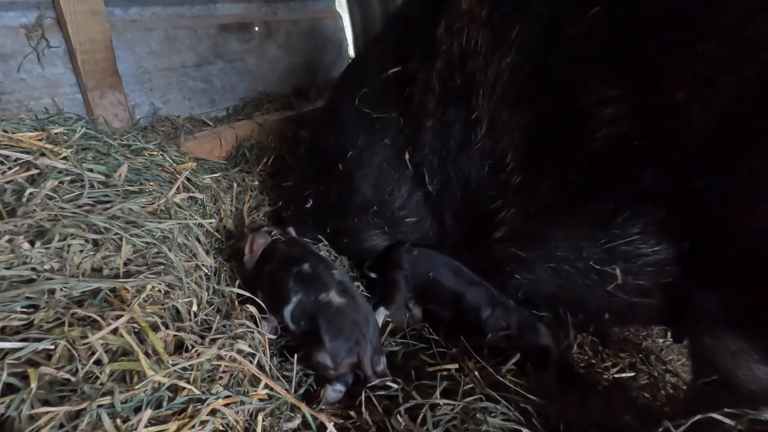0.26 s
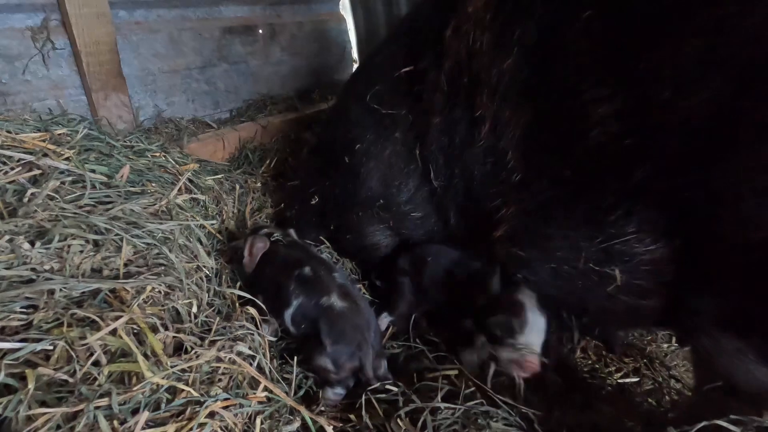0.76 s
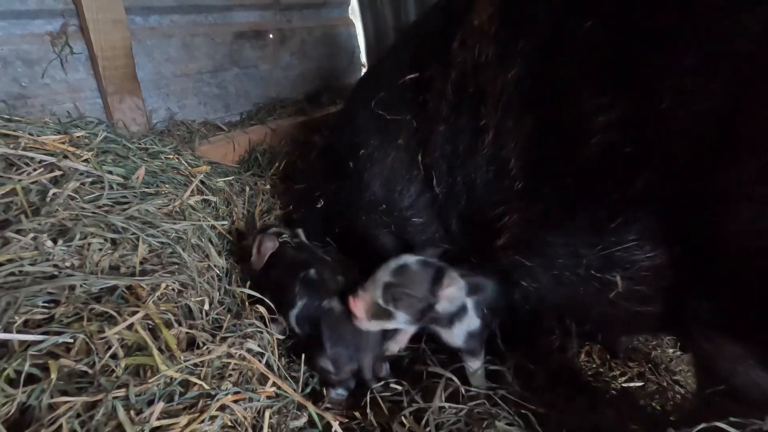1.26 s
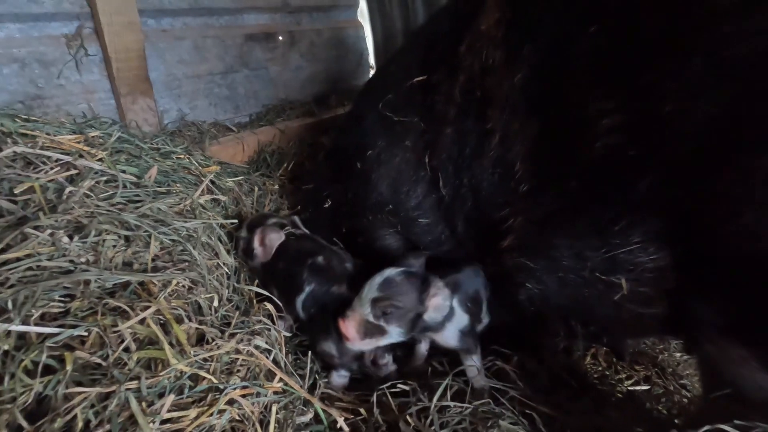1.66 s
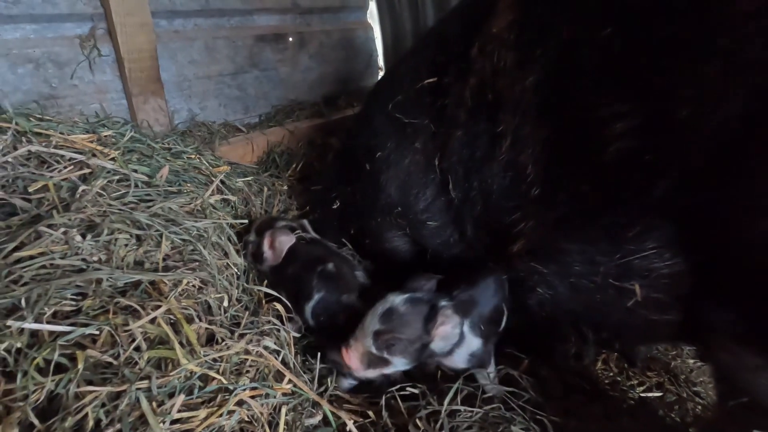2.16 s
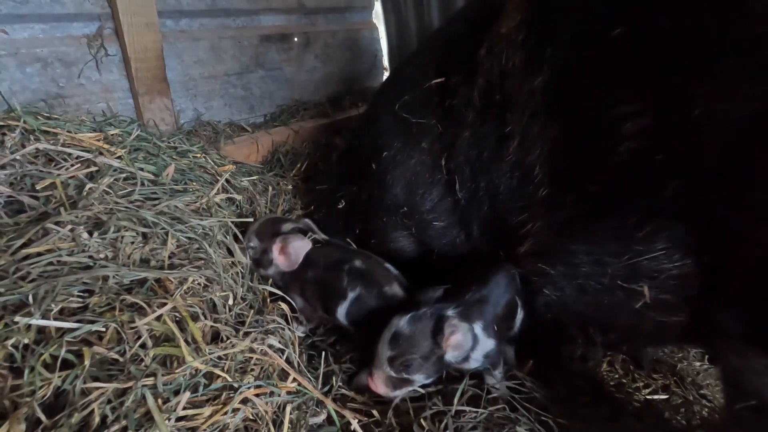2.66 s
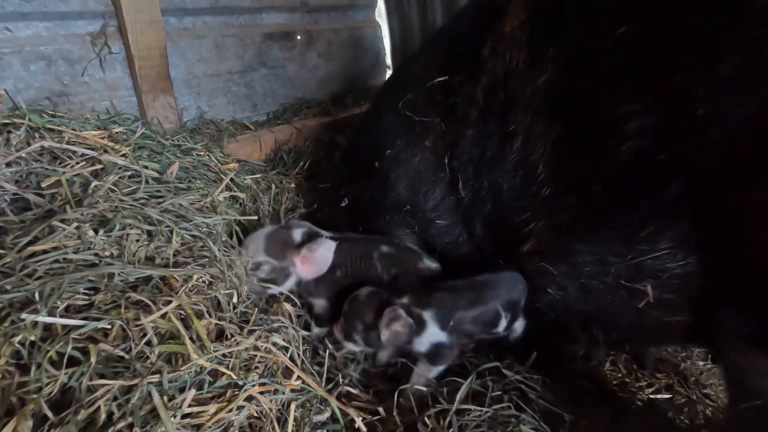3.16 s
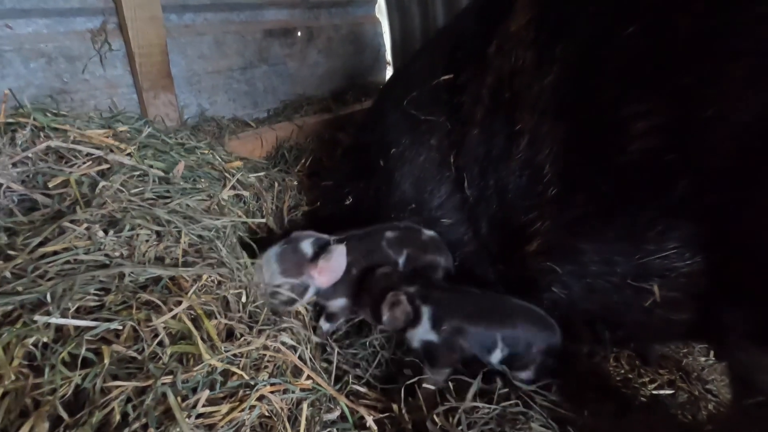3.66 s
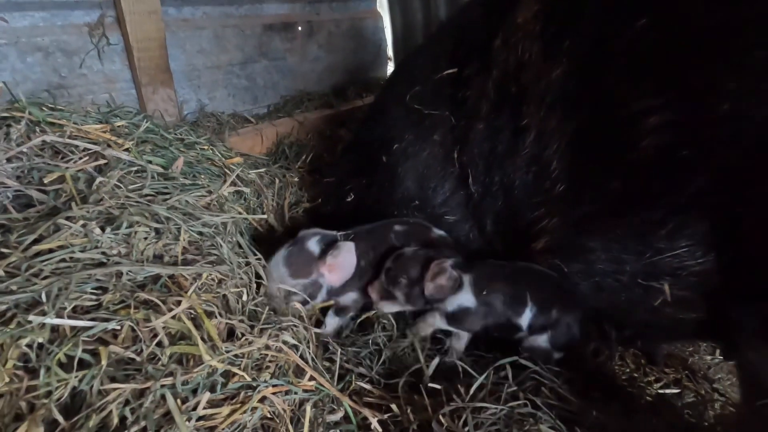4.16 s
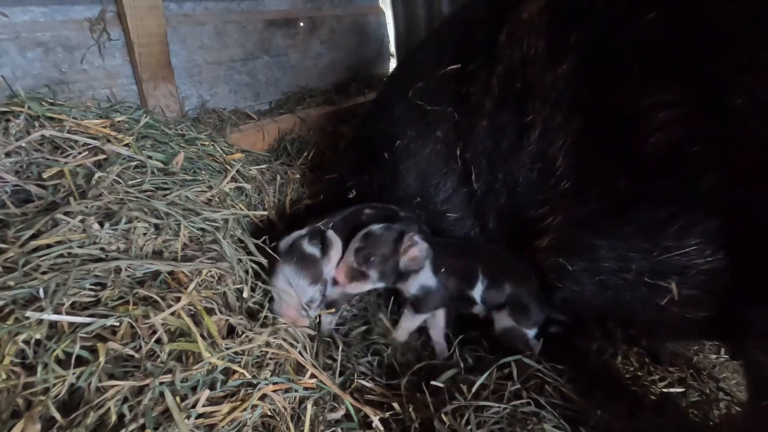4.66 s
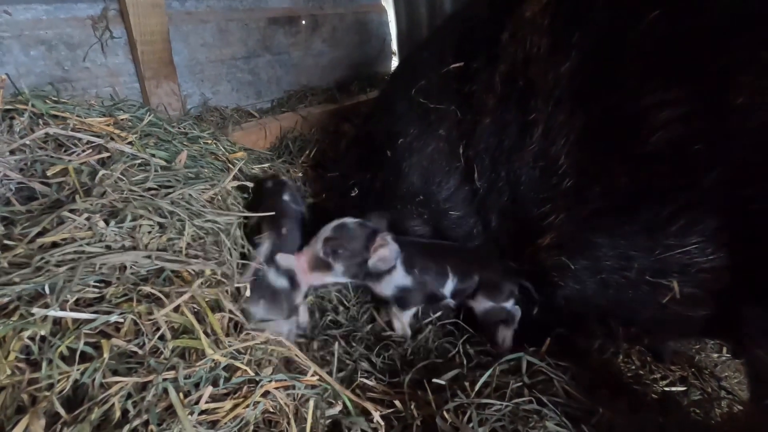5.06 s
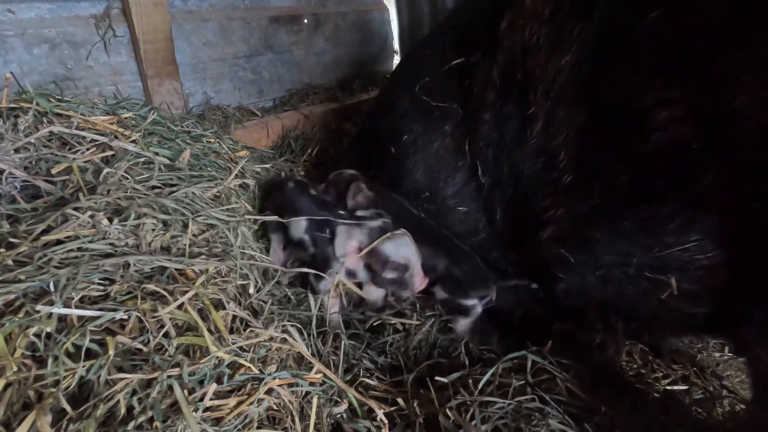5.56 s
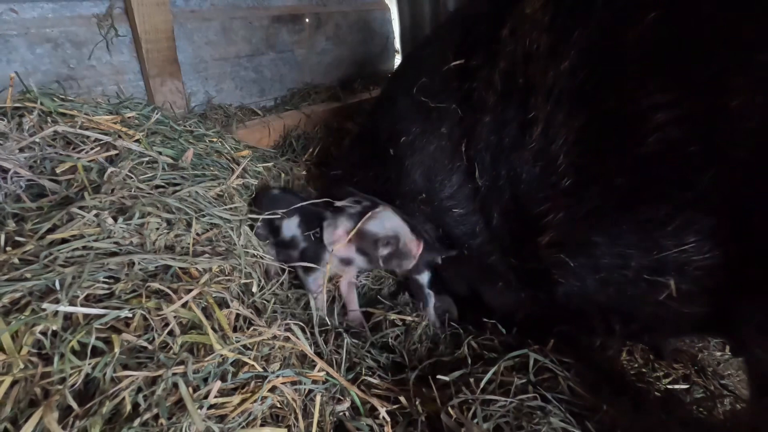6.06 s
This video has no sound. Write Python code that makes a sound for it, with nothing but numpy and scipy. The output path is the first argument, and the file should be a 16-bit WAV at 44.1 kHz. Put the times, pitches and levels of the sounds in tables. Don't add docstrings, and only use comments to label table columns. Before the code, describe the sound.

A close, dry-sounding straw pen with a short, dull echo. From 0 s a sharp grunt starts a loose run lasting the full 6.3 seconds: tiny trains of raspy pulses, bright and nasal, alternating with deeper, muffled grunts. Early grunts are spaced out, with sharp ones near 1.2 and 1.7 s; from 2.1 s a sharp grunt runs straight into a deep one. Faint thin whistles sound outside around 0.8, 1.3 and 1.7 s, a blurred trill at 2.0-2.4 s, then two clearer chirps at 2.5-2.8 s. Low rumble puffs throughout, with bumps at 1.6 s and, strongest, 3.4 s, and a long soft push at 5.6 s. Faint peeps flicker at 1.2, 4.0-4.5 and 5.4 s. Straw rustling and dry cracks thicken from 3 s, brightest around 4.7-5.6 s. Grunts continue until about 6.2 s, over soft airy hiss.

```python
import sys
import numpy as np
from scipy import signal
from scipy.fft import rfft, irfft, next_fast_len
from scipy.io import wavfile
from scipy.ndimage import uniform_filter1d, map_coordinates

SR = 44100
rng = np.random.default_rng(int(sys.argv[2]) if len(sys.argv) > 2 else 0)


def generate_wav(signal):
    frames = np.transpose(np.atleast_2d(signal))
    scaled = np.clip(frames, -1, 1) * 32767
    pcm = np.round(scaled).astype(np.int16)
    wavfile.write(sys.argv[1], SR, pcm)


def volts_from_decibels(level):
    exponent = np.asarray(level, float) / 20
    return 10 ** exponent


N = 278271


def in_time(rows):
    s, *columns = np.transpose(rows)
    return [np.interp(np.arange(N) / SR, s, column) for column in columns]


def at_hz(points, hz):
    table_hz, value = np.transpose(points)
    return np.interp(np.log(hz), np.log(table_hz), value)


def rms_one(x):
    return x / np.sqrt(np.mean(x ** 2) + 1e-20)


def add(out, s, piece):
    i = max(round(s * SR), 0)
    out[i:i + len(piece)] += piece[:N - i]


def filtered(x, order, hz, kind="low"):
    return signal.sosfilt(signal.butter(order, hz, kind, fs=SR, output="sos"), x)


def drift(rate_hz):
    knots = rng.standard_normal(400)
    place = np.arange(N) / SR * np.clip(rate_hz, .1, 60)
    return rms_one(map_coordinates(knots, [place], order=3))


def swells(rows, edge_s):
    t, power = np.arange(N) / SR, 0
    for s, length, db in rows:
        outside = np.maximum(np.abs(t - s - length / 2) - length / 4, 0)
        power = power + volts_from_decibels(2 * db) * np.exp(-(outside / edge_s) ** 2)
    return power


def effort(x):
    size = int(0.01 * SR)
    return uniform_filter1d(uniform_filter1d(x ** 2, size=size), size=size).clip(0)


def rings(modes, detune, spread_db, rise_cycles=0.23, mouth_cycles=0.17):
    t = np.arange(SR // 8) / SR
    hz, db, t60 = np.transpose(sorted(modes))[:, :, None]
    level_chance, pitch_chance = rng.standard_normal((2, len(modes), 1))
    signs = (-1) ** np.arange(len(modes))[:, None]
    rise = np.where((800 < hz) & (hz < 1900), mouth_cycles, rise_cycles)
    decay = volts_from_decibels(db + spread_db * level_chance - 60 * t / t60)
    swell = 1 - np.exp(-t * hz / rise)
    return (signs * decay * swell * np.sin(2 * np.pi * hz * (1 + detune * pitch_chance) * t)).sum(0)


# frequency_hz, likeness [0-1]
LIKENESS = [(60, .97), (130, .985), (250, 0.99), (700, 0.28), (1500, 0.5), (3000, 0.3), (5000, .9),
            (5800, .995), (7800, .995), (9000, 0.6), (14000, 0.1)]


def noise(spectrum, patchy_db, grains=1):
    low, high = spectrum[0][0], spectrum[-1][0]
    edges = low * 2 ** np.arange(0, np.log2(high / low) + .01, 1 / 3)
    out, white = 0, rng.standard_normal((2, 2, N)) * grains
    for k, (a, b) in enumerate(zip(edges, edges[1:])):
        mid, side = filtered(white[k % 2], 2, [a, b], "band")
        hz = np.sqrt(a * b)
        alike = np.clip(at_hz(LIKENESS, hz), 0, 1)
        gain = volts_from_decibels(at_hz(spectrum, hz) + patchy_db * drift(9.8))
        out = out + gain * (np.sqrt(1 + alike) * mid + np.sqrt(1 - alike) * side * [[1], [-1]])
    return rms_one(out)


def pen(x, t60, level_db, top_hz=3600):
    t = np.arange(round(t60 * SR)) / SR
    shared, *own = rng.standard_normal((3, len(t))) * volts_from_decibels(-60 * t / t60) * (t > .003)
    own = signal.lfilter(*signal.butter(1, 550, "high", fs=SR), own)
    echoes = filtered(shared + .45 * own, 2, [330, top_hz], "band")
    echoes = volts_from_decibels(level_db) * echoes / np.linalg.norm(echoes[0])
    return x + signal.fftconvolve(x[None], echoes, axes=1)[:, :N]


# time_s, level_db
STIR = [(0, 3.5), (1.1, -1), (1.5, 0), (1.8, 3.5), (2.3, 0), (2.65, -4.5), (2.92, -6.5), (3.1, -4.5),
        (3.4, -3), (4.2, 3), (5.1, 1), (6.31, 5)]


def stir():
    return in_time(STIR)[0]


# frequency_hz, level_db [dB per Hz]
AIR = [(210, -68), (350, -15.5), (547, 7), (630, -15.5), (725, 8), (813, -14), (866, -6), (1050, -0.5),
       (1350, 5), (1700, -1), (2770, -11.5), (3310, -6.5), (3570, -10.5), (7400, -28.5), (9620, -35),
       (16300, -120)]
# time_s, share [0-1]
GAP_FILL = [(0, 1), (1.1, 0.9), (1.2, .1), (3.5, 0.2), (3.7, 0.4), (3.95, 0), (4.5, 0.9), (5.2, 0),
            (6.1, 0.3), (6.31, 1)]


def air(sharp):
    full = noise(AIR, 2.2)
    fill = in_time(GAP_FILL)[0].clip(0, 1)
    hush = fill * full + (1 - fill) * filtered(full, 1, (656, 975), "bandstop")
    air_db, breath_db = -54, -12.5
    return np.sqrt(volts_from_decibels(2 * (air_db + stir())) + volts_from_decibels(2 * breath_db) * effort(sharp)) * hush


# start_s, length_s, level_db
GUSTS = [(0.13, .21, -30.5), (0.55, 0.15, -36), (0.841, 0.058, -32), (1.24, 0.031, -36), (1.63, 0.2, -35.5),
         (1.8, 0.15, -35), (2.07, 0.27, -31), (2.47, 0.24, -38.5), (3.0, 0.075, -37), (3.13, 0.083, -31.5),
         (3.32, 0.081, -37), (3.77, 0.11, -32.5), (4.0, 0.48, -34), (4.43, 0.1, -30), (4.7, 0.11, -41),
         (4.88, 0.14, -30), (5.08, 0.15, -34), (5.55, 0.14, -31), (5.78, 0.058, -32.5), (5.93, 0.091, -36),
         (6.05, 0.088, -38), (3.62, 0.069, -32), (5.5, 0.25, -32)]


def gusts():
    return swells(GUSTS, 0.035)


# frequency_hz, level_db [dB per Hz]
RUMBLE = [(11, -42), (20, -14.5), (34, -2), (48, 2), (55, -19), (60, -10.5), (70, -19), (90, -7),
          (120, -50), (200, -120)]


def wind(puffs):
    low = noise(RUMBLE, 1.0)
    height = np.abs(signal.hilbert(low[0], next_fast_len(N))[:N])
    height = uniform_filter1d(height, size=1500)
    rumble = rms_one(low / (height + 0.19) ** 0.45)
    calm_db = -40
    return np.sqrt(volts_from_decibels(2 * calm_db) + puffs) * rumble


# frequency_hz, level_db [dB per Hz]
CHEST = [(41, -54), (70, -4.5), (107, -13.5), (146, -6), (179, -7), (214, -8.5), (500, -30.5), (650, -50),
         (1100, -120)]


def chests(sharp, deep, puffs):
    driven = volts_from_decibels(2 * -12) * effort(sharp) + volts_from_decibels(2 * -15) * effort(deep) + volts_from_decibels(2 * -7.5) * puffs
    flank_db = -49 + stir()
    return np.sqrt(volts_from_decibels(2 * flank_db) + driven) * noise(CHEST, 2.65)


# frequency_hz, level_db [dB per Hz]
STRAW = [(2500, 5), (3200, -4.5), (4500, -0.5), (6000, -2.5), (8000, -1.5), (10000, -5), (12000, -3),
         (14000, -8.5), (16000, -1)]
# start_s, length_s, level_db
RUSTLES = [(0, 0.012, -69), (.53, 0.075, -70), (1.07, 0.13, -72.5), (1.42, 0.039, -73), (1.86, 0.034, -76),
           (2.1, 0.086, -67), (2.46, 0.13, -77.5), (3.0, 0.14, -70.5), (3.15, 0.13, -67),
           (3.44, 0.088, -66.5), (3.59, 0.072, -74.5), (3.79, 0.031, -71.5), (4.28, 0.14, -68.5),
           (4.7, 0.2, -69.5), (4.93, 0.12, -63), (5.08, 0.14, -66), (5.38, 0.096, -66),
           (5.56, 0.087, -67.5)]


def straw():
    slips = rng.random(N) < 900 / SR
    grains = volts_from_decibels(5.5 * np.minimum(rng.exponential(1, N), 3) * slips)
    bedding_db = -76.5 + 0.84 * stir()
    level = np.sqrt(volts_from_decibels(2 * bedding_db) + swells(RUSTLES, 0.041))
    flutter = volts_from_decibels(13.5 + 1.8 * drift(48))
    return level * flutter * noise(STRAW, 1.0, grains)


# start_s, length_s, level_db
CHIRPS = [
    (2.548, 0.079, -51.5),
    (2.7, 0.063, -54),
]
# share of length [0-1], pitch_hz, level_db
CHIRP_SHAPE = [(0, 4320, -19), (.34, 4270, -6), (.66, 4326, 1), (.8, 4260, -0.5), (.92, 3980, -0.5),
               (1.02, 3600, -10)]
# start_s, length_s, pitch_hz, level_db
WHISTLES = [
    (0.801, 0.11, 6540, -63.5),
    (1.278, 0.12, 6550, -67),
    (1.674, 0.11, 6450, -66),
]
# time_s, pitch_hz, level_db
TRILL = [(2.02, 4770, -65), (2.066, 4670, -57.5), (2.168, 4640, -65), (2.36, 4800, -66), (2.426, 4840, -61),
         (2.44, 4960, -96)]


def birds():
    out = np.zeros(N)
    smear = rms_one(filtered(rng.standard_normal(N), 2, 170))
    chirps = [[(s + share * length, hz, db + less) for share, hz, less in CHIRP_SHAPE]
              for s, length, db in CHIRPS]
    sag, edge_db = 0.005, -8
    whistles = [[(s, hz * (1 + sag), db + edge_db),
                 (s + length / 4, hz, db),
                 (s + length / 2, hz, db),
                 (s + length, hz * (1 - sag), db + edge_db)] for s, length, hz, db in WHISTLES]
    for note in chirps + whistles + [TRILL]:
        hz, db = in_time(note)
        start, end = note[0][0], note[-1][0]
        gate, = in_time([(start - .008, 0), (start, 1), (end, 1), (end + 0.003, 0)])
        flutter = smear if note is TRILL else volts_from_decibels(1.0 * drift(46))
        out += gate * volts_from_decibels(db + 7.5) * flutter * np.sin(2 * np.pi * np.cumsum(hz) / SR)
    return out


# time_s, peak_db, pitch_hz, t60_s
BUMPS = [
    (1.64, -16, 59, 0.1),
    (3.44, -10, 56, 0.08),
    (3.477, -9.5, 12.8, 0.26),
    (5.599, -21, 37, 0.34),
    (5.338, -36, 153, 0.076),
    (5.456, -26, 146, 0.064),
]


def bumps():
    out = np.zeros(N)
    for s, db, hz, t60 in BUMPS:
        add(out, s, np.sign(20 - hz) * volts_from_decibels(db) * rings([(hz, 0, t60)], 0, 0))
    return out


# time_s, peak_db, pitch_hz
TICKS = [(1.2321, -66, 11200), (1.7445, -70, 8800), (2.0717, -69, 9100), (2.4468, -63, 9800),
         (2.4882, -61, 8500), (3.024, -70, 8550), (3.5788, -62, 10100), (3.8027, -58, 10700),
         (3.9529, -60, 9100), (4.4273, -66, 8600), (4.731, -56, 11000), (4.9187, -64, 10300),
         (5.023, -64, 9510), (5.273, -55, 10600), (5.5174, -62, 8600), (5.5614, -59, 8500)]


def ticks():
    out = np.zeros(N)
    for s, db, hz in TICKS:
        modes = [(hz * side, 0, .006) for side in (.76, .88, 1.0, 1.15)]
        add(out, s, volts_from_decibels(db + 11) * rings(modes, 0.035, 3.4))
    return out


# time_s, peak_db, pitch_hz, t60_s
SNAPS = [(1.04, -26.5, 1260, 0.0046), (1.17, -28.5, 365, 0.022), (1.327, -27.5, 1260, 0.025),
         (2.023, -29, 1760, 0.0062), (2.391, -33, 503, 0.043), (2.918, -40.5, 576, 0.071),
         (3.363, -37, 560, 0.029), (4.094, -35, 510, 0.052), (4.243, -40, 444, 0.03),
         (5.456, -34, 490, 0.052), (5.472, -38, 590, 0.044), (5.881, -32, 600, 0.05)]


def snaps():
    out = np.zeros(N)
    for s, db, hz, t60 in SNAPS:
        modes = [(hz, 0, t60), (1400, -4, .02), (2300, -8, .015), (4000, -14, .01)]
        add(out, s, volts_from_decibels(db - 6.5) * rings(modes, 0.0085, 0.88))
    return out


# time_s, peak_db,
# pitch_hz, t60_s
PEEPS = [(1.19, -41, 1400, .04), (4.043, -41, 1250, .04), (4.073, -40, 1260, .045), (4.203, -49, 3320, .03),
         (4.205, -50, 4150, .03), (4.462, -40, 3170, .03), (4.463, -43, 3400, .025),
         (4.464, -45, 3680, .07), (5.386, -48, 4500, .02)]


def peeps():
    out = np.zeros(N)
    for s, db, hz, t60 in PEEPS:
        add(out, s, volts_from_decibels(db + 6) * rings([(hz, 0, t60)], 0, 0, 6, 6))
    return out


def tract_modes(place, tract, manner, colour, arc, body, throat_s, lip_s, crack_db,
                jaw_reach, jaw_order, tightening):
    throat_hz, mouth_hz, lip_hz, snout_hz = tract
    glide, throat_db, cheek_db, snout_db = manner
    lip_db, upper_db, nose_hz, nose_db, mouth_s = colour
    _, opening_db, shutting_db, snout_s, jaw_turn = arc
    wide_db = np.interp(place, [0, .65, 1], [opening_db, 0, shutting_db])
    snout_db = snout_db + wide_db
    moved = 1 + np.clip(glide * ((place - jaw_turn) / jaw_reach) ** jaw_order, -0.31, 0.31)
    mouth_hz = mouth_hz * moved
    modes = [(throat_hz * (1 + tightening * (place - .5)), throat_db, throat_s),
             (mouth_hz, 0, mouth_s),
             (lip_hz * moved, lip_db, lip_s),
             (snout_hz, snout_db, snout_s),
             (nose_hz, nose_db, .025)]
    modes += [(snout_hz * side, snout_db - 8.0, .014) for side in (.89, 1.11)]
    modes += [(mouth_hz * 1.076, crack_db, .009), (snout_hz * .97, snout_db + crack_db - 6.5, .008)]
    for hz, db, t60 in body:
        cheek = cheek_db * (250 < hz < 700)
        upper = (upper_db + wide_db) * (hz > 2200)
        modes.append((hz, db + cheek + upper, t60))
    return modes


def voice(grunts, shapes, body, tract_settings, rasp_db, rasp_s, rise_cycles, mouth_cycles,
          shut_s, open_db, dull_hz, soft_start, slowing):
    out, t, after = np.zeros(N), np.arange(SR // 40) / SR, np.arange(SR // 8) / SR
    opened = 1 / (1 + np.exp((shut_s - after) / 0.0008))
    for (first, last, peak_db, last_db, closing_db), shape in zip(grunts, shapes):
        start_db = shape[-1][0]
        count = max(round((last - first) / .023), 1)
        gaps = 1 + slowing * np.linspace(0, 1, count) ** 3
        places = np.r_[0, np.cumsum(gaps)] / gaps.sum()
        pulse_db = np.interp(places, [0, .63, 1], [peak_db + start_db, peak_db, last_db])
        rasp = rng.standard_normal(len(t))
        for place, db in zip(np.r_[places, 1 + 1.06 / count], np.r_[pulse_db, closing_db]):
            push = rasp + 1.96 * rng.standard_normal(len(t))
            push = volts_from_decibels(rasp_db) * push * t / rasp_s * np.exp(1 - t / rasp_s)
            push[0] = 1
            if place > 1 or soft_start and place == 0:
                push = signal.lfilter(*signal.butter(1 + (place == 0), dull_hz, fs=SR), push)
            modes = tract_modes(place, *shape, body, **tract_settings)
            ring = rings(modes, .007, 2.0, rise_cycles, mouth_cycles)
            pulse = signal.fftconvolve(push, ring)[:len(after)]
            shut_db = -8.5 * (place >= 1)
            add(out, first + place * (last - first), volts_from_decibels(db + (open_db + shut_db) * opened) * pulse)
    return filtered(out, 2, 5200)


# first_pulse_s, last_pulse_s, peak_db, last_db, closing_pulse_db
DEEP = [(0.186, 0.264, -38.5, -37.5, -50), (0.432, 0.546, -27, -28.5, -32), (0.793, 0.856, -44, -43.5, -67),
        (2.140, 2.270, -25, -29.5, -47), (3.073, 3.182, -28, -30, -35), (3.692, 3.785, -27.5, -25, -25.5),
        (4.021, 4.077, -56, -46, -59), (4.378, 4.486, -31.5, -28.5, -35), (4.812, 4.941, -22.5, -26, -28),
        (5.588, 5.650, -30.5, -62, -74), (5.667, 5.800, -28, -37.5, -64), (6.085, 6.174, -33, -29.5, -48)]
# throat_hz, mouth_hz, lip_hz, snout_hz
DEEP_TRACT = [(181.4, 1500, 1680, 3550), (207.4, 1285, 1660, 2920), (162.7, 1285, 443, 3800),
              (205, 1300, 1540, 2885), (208, 1010, 860, 2730), (217, 1036, 1380, 2770),
              (210, 1680, 1200, 2400), (224, 1050, 1500, 4000), (209, 1097, 1600, 3280),
              (177, 1020, 170.5, 8500), (207, 1085, 1500, 3030), (204, 1270, 1085, 2910)]
# jaw_glide [share], throat_db, cheek_db, snout_db
DEEP_MANNER = [(-0.028, 20, 6.5, 0), (0.03, 8, -11, -1.5), (0.014, 22.5, 5.5, -3), (0.027, 5, -8, -1),
               (0.22, 8, 0.5, -9.5), (0.07, 5.5, -2.5, -5), (-0.12, 3, -14, -30), (0.022, 6, -1, -8.5),
               (0.024, 1.5, -3.5, -4.5), (0.01, 15.5, 0, -18), (0.026, 6.5, 6, 8.5), (0.021, 8.5, 4, 9.5)]
# lip_db, upper_db, nose_hz, nose_db, mouth_ring_s
DEEP_COLOUR = [(-3.5, -6, 2400, 1.5, 0.025), (-6.5, 5.5, 3900, -8.5, 0.076), (-20, 2, 3200, -12, 0.063),
               (-2, 0, 3810, -13.5, 0.04), (-13, 1.5, 2270, -10, 0.043), (-13, -2, 3746, -15.5, 0.071),
               (-18, -20, 710, -11, 0.025), (-15, -6, 2270, -16, 0.055), (-12.5, -11, 2600, -14, 0.073),
               (-19, -1, 1300, -18, 0.024), (-9.5, 0, 2620, -6.5, 0.065), (-6.5, -3, 2430, -9.5, 0.035)]
# first_pulse_db [re peak], snout_first_db, snout_last_db, snout_ring_s, jaw_turn [0-1]
DEEP_ARC = [(-5, 3, 7, 0.038, 0.59), (-7, -12, -4, 0.038, 0.626), (1, 2, 8.5, 0.039, 0.65),
            (-7, -2, -9, 0.019, 0.47), (-6.5, 4, -9, 0.02, .59), (-5.5, -1, -3.5, 0.018, 0.71),
            (-9, -4, -4, .02, 0.42), (-1.5, -2, -1, 0.012, 0.393), (-7.5, 0, -10, 0.03, 0.56),
            (-5.5, -4, -4, .02, 0.52), (-10.5, -1, -5.5, 0.011, 0.59), (-6, -7, -14, 0.014, 0.68)]
# frequency_hz, level_db, t60_s
DEEP_BODY = [(41.8, -6, 0.11), (102, -30, 0.017), (295, -3.5, 0.028), (458, 0.0, 0.039), (2157, -26, 0.051),
             (2603, -11, 0.026), (3830, -20, 0.033), (4770, -24, 0.013), (5600, -18, 0.021)]


def deep_voice():
    shapes = zip(DEEP_TRACT, DEEP_MANNER, DEEP_COLOUR, DEEP_ARC)
    tract = dict(throat_s=0.096, lip_s=0.037, crack_db=-2.5, jaw_reach=0.409, jaw_order=4, tightening=0)
    return voice(DEEP, shapes, DEEP_BODY, tract, rasp_db=-40, rasp_s=0.0078, rise_cycles=0.53,
                 mouth_cycles=0.56, shut_s=0.012, open_db=-3.0, dull_hz=470, soft_start=True,
                 slowing=0.068)


# first_pulse_s, last_pulse_s, peak_db, last_db, closing_pulse_db
SHARP = [(0.007, 0.034, -25, -30, -53), (0.605, 0.658, -34.5, -36.5, -64), (1.211, 1.254, -23, -22, -60),
         (1.701, 1.769, -23, -30.5, -66), (2.076, 2.138, -27.5, -21.5, -25.5),
         (2.446, 2.511, -21.5, -23.5, -30.5), (2.972, 3.038, -24, -21, -46), (3.579, 3.651, -27, -34, -35),
         (3.801, 3.827, -21, -29.5, -41), (4.150, 4.201, -45.5, -44, -61), (4.269, 4.336, -27, -25, -56),
         (4.671, 4.730, -23, -20, -27), (5.048, 5.113, -25.5, -23, -32.5),
         (5.517, 5.584, -23.5, -22.5, -27), (5.922, 5.990, -25.5, -24.5, -61)]
# throat_hz, mouth_hz, lip_hz, snout_hz
SHARP_TRACT = [(449, 1370, 1500, 3940), (404, 1420, 2070, 4500), (445, 1455, 1930, 4450),
               (470, 1450, 1780, 3500), (442, 1360, 1730, 3700), (472, 1480, 1780, 3100),
               (467, 1430, 1900, 3200), (427, 1505, 1900, 4050), (453, 1500, 2110, 3570),
               (430, 1100, 2000, 2450), (443, 1460, 1900, 4000), (446, 1640, 1395, 3070),
               (450, 1390, 1900, 3050), (465, 1300, 1890, 3120), (456, 1510, 1713, 3175)]
# jaw_glide [share], throat_db, cheek_db, snout_db
SHARP_MANNER = [(0.0, 1.5, 6.5, -5.5), (-0.025, -4.5, 4.5, -10.5), (-0.044, -1, 2.5, -13.5),
                (-0.044, 5.5, 8.5, -3.5), (-0.021, 4, 6, -12), (-0.035, 4, 7.5, -5.5), (0.062, 2, 7, -18.5),
                (-0.00086, 0.5, 4.5, -15.5), (0.04, 2.5, -17, -20), (0.042, 4.5, -19, 4),
                (-0.03, 0, 4.5, -25), (-0.018, 2.5, 4, -6.5), (-0.046, 2.5, 6.5, -6),
                (-0.032, 1, 5.5, -2.5), (-0.0077, 3.5, 14.5, 2)]
# lip_db, upper_db, nose_hz, nose_db, mouth_ring_s
SHARP_COLOUR = [(2, -6, 3330, -7.5, 0.015), (-8, -5, 4900, -16, 0.029), (-2, 3.5, 2400, -13, 0.045),
                (1.5, 7.5, 2510, -4.5, 0.021), (1, -4, 3750, -23, 0.026), (1, 5, 2508, -13, 0.031),
                (-7, -1.5, 2265, -0.5, 0.023), (-0.5, -14, 2200, -17, 0.029), (-4, 2, 4209, -13, 0.015),
                (-12, -6, 4800, -5, 0.022), (1, -2, 3200, -19, 0.039), (-0.5, -2, 3300, -9.5, 0.034),
                (-4, 2, 3710, -8, 0.022), (-2.5, 3, 3730, -4.5, 0.018), (3, 5, 2270, -4, 0.028)]
# first_pulse_db [re peak], snout_first_db, snout_last_db, snout_ring_s, jaw_turn [0-1]
SHARP_ARC = [(-3.5, -6, -3, 0.052, .36), (0, 1, 2, 0.029, 0.3), (-5.5, -0.5, -4, 0.052, 0.66),
             (-9, 2.5, -3.5, 0.022, 0.39), (-4, 7, -2, 0.021, 0.4), (-7.5, 1, -15, 0.028, 0.3),
             (-6.5, 5, 0.5, 0.024, 0.13), (-8, 11, -12, 0.046, 0.6), (-6.5, 3, -8, 0.027, 0.26),
             (-2, 5, 7.5, 0.03, 0.07), (-5.5, 2, 0, 0.029, 0.16), (-3.5, 7, 3, 0.026, 0.4),
             (-3.5, 7, -16, 0.03, 0.26), (-5, 6, -7, 0.025, 0.52), (-7, 6.5, 0.5, 0.027, 0.3)]
# frequency_hz, level_db, t60_s
SHARP_BODY = [(45.6, -5, 0.15), (180, -5.5, 0.035), (602, -5.5, 0.011), (1044, -6.5, 0.027),
              (1967, -5.5, 0.015), (2454, -24, 0.022), (2970, -21, 0.003), (3250, -35, 0.066),
              (3847, -17.5, 0.044), (4320, -26, 0.063), (4810, -23, 0.025), (7610, -25.5, 0.024)]


def sharp_voice():
    shapes = zip(SHARP_TRACT, SHARP_MANNER, SHARP_COLOUR, SHARP_ARC)
    tract = dict(throat_s=0.059, lip_s=0.024, crack_db=6.0, jaw_reach=0.618, jaw_order=2,
                 tightening=0.029)
    return voice(SHARP, shapes, SHARP_BODY, tract, rasp_db=-38, rasp_s=0.0036, rise_cycles=0.23,
                 mouth_cycles=0.22, shut_s=0.01, open_db=2.0, dull_hz=1490, soft_start=False,
                 slowing=0.0906)


def scene():
    sharp, deep, puffs = sharp_voice(), deep_voice(), gusts()
    background = air(sharp) + wind(puffs) + chests(sharp, deep, puffs) + straw()
    outside = pen(birds(), 0.051, -15.0)
    near = pen(sharp + snaps() + peeps(), 0.15, -13.5)
    muffled = pen(deep, .11, -13.0, top_hz=1740) * volts_from_decibels([[.7], [-.7]])
    return background + outside + bumps() + ticks() + muffled + near


def band_limit(x):
    return signal.sosfilt(signal.butter(12, 15600, fs=SR, output="sos"), x)


# frequency_hz, level_db
LOUDER_LEFT = [(60, -0.5), (110, -0.5), (200, -2), (380, 0), (560, 2), (800, 4.5), (1290, 1), (2380, 2.5),
               (4400, -0.5), (8120, 1.5), (15000, 15)]
# frequency_hz, lag [radians]
LEFT_LAG = [(30, 0.086), (150, 0.022), (300, 0.033), (520, 0.15), (860, 0.77), (1640, 0.74), (2400, 0.61),
            (3200, 1.17), (4000, 0.95), (5000, 0.05), (8500, 0.02), (10900, .4)]
# frequency_hz, level_db
MICROPHONE = [(6500, 0.5), (7700, 4.5), (8000, -0.5), (8300, -7), (8800, -11), (10000, -10.5),
              (14000, -14.5)]


def record(dry):
    size = next_fast_len(N + 4096)
    hz = np.maximum(np.arange(size // 2 + 1) * SR / size, 1)
    half = volts_from_decibels(at_hz(LOUDER_LEFT, hz) / 2) * np.exp(-.5j * at_hz(LEFT_LAG, hz))
    response = volts_from_decibels(at_hz(MICROPHONE, hz)) * (hz < 14500)
    ports = irfft(rfft(dry, size) * [half, 1 / half] * response, size)[:, :N]
    ports = filtered(ports, 2, 11, "high")
    limit = .4
    ports = limit * np.tanh(ports / limit)
    return band_limit(ports)


dry = scene()
out = record(dry)
generate_wav(out)
```